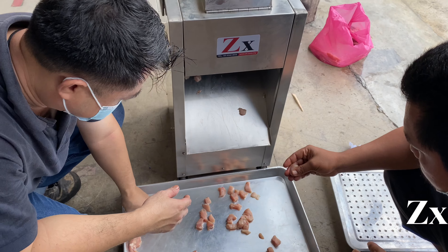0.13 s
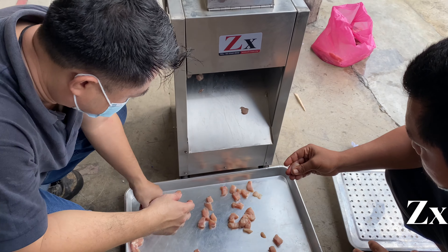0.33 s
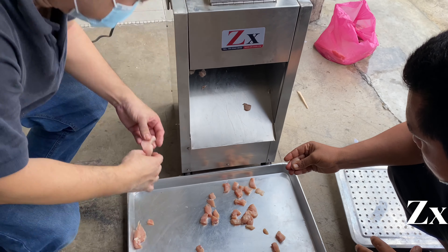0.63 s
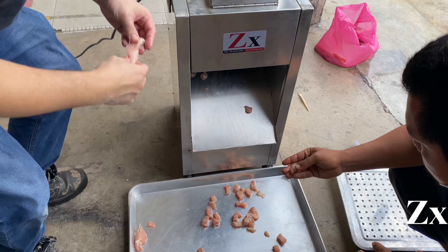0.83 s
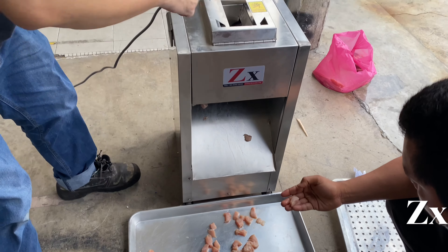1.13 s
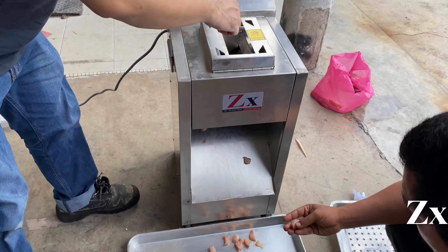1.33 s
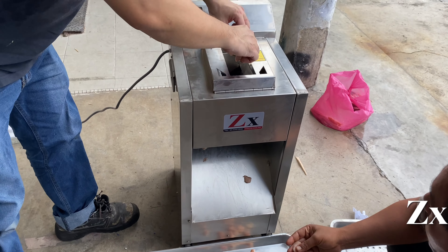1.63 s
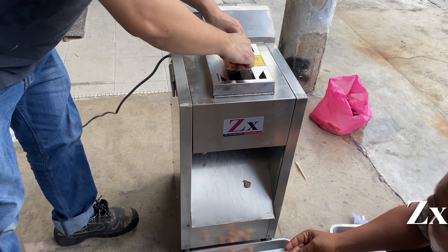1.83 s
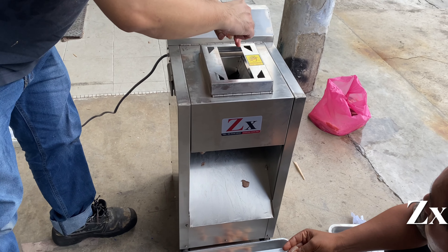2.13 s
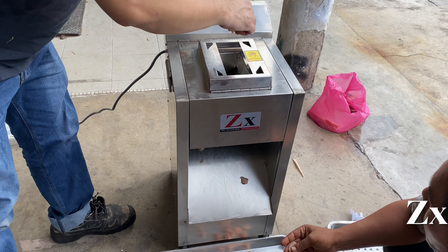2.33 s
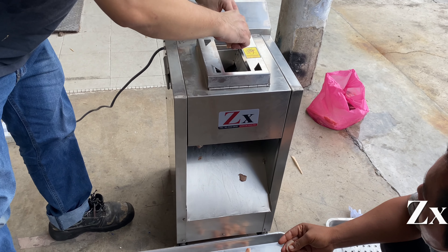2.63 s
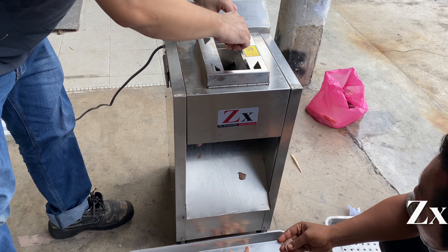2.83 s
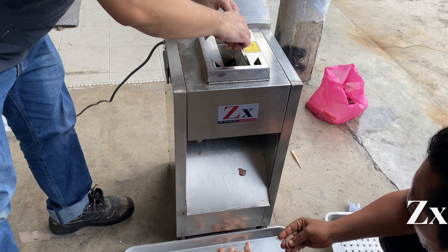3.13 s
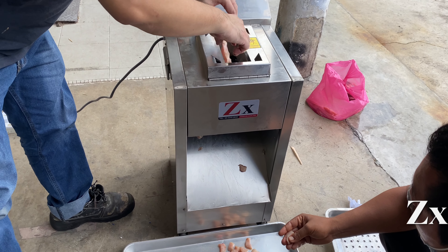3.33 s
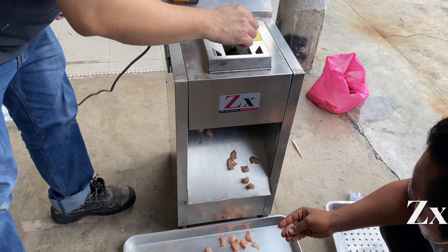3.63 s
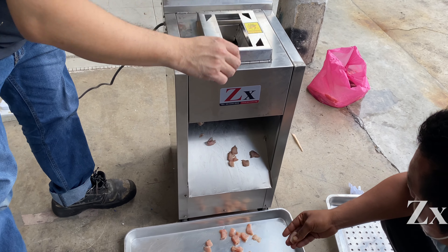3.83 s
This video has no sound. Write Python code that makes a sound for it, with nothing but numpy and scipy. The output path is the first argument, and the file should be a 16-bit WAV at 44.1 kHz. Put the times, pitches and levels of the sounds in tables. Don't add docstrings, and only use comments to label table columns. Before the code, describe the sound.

An electric meat cutter runs throughout on a concrete yard, its motor rumbling and humming, panels rattling about nine times a second, blades hissing, with a few light knocks, heard close on a phone in stereo.

```python
import sys
import numpy as np
from scipy import signal
from scipy.fft import rfft, irfft, next_fast_len
from scipy.io import wavfile

SR = 44100
rng = np.random.default_rng(int(sys.argv[2]) if len(sys.argv) > 2 else 0)


def how_loud(loudness_db):
    steps = np.asarray(loudness_db, float) / 20
    return 10 ** steps


def wav_out(sig):
    wavfile.write(sys.argv[1], SR, np.round(np.clip(np.atleast_2d(sig).T, -1, 1) * 32767).astype(np.int16))


N = 175959


def evened(x):
    return x / np.sqrt(np.mean(x ** 2) + 1e-20)


def read(points, hz):
    f, value = np.transpose(points)
    return np.interp(np.log(hz + 1), np.log(f + 1), value)


def over_time(points):
    return np.interp(np.arange(N) / SR, *np.transpose(points))


def drift(rate_hz):
    spectrum = rfft(rng.standard_normal(N))
    return evened(irfft(spectrum / (1 + (np.fft.rfftfreq(N, 1 / SR) / rate_hz) ** 4), N))


def shaken(colour, strength):
    # [f/Hz, width/Hz, lift/dB]
    panels = [(230, 25, 2), (278, 25, 3), (450, 50, 3), (1250, 80, 3), (5200, 400, 2), (11250, 400, 5),
              (12700, 900, -7), (611, 36, 5), (796, 45, 4), (2130, 50, 5.5), (2445, 45, 4), (3243, 70, 4),
              (6260, 250, 5), (7525, 110, 7)]
    hz = np.fft.rfftfreq(N, 1 / SR)
    lift_db = sum(db / (1 + (2 * (hz - f) / width) ** 2) for f, width, db in panels)
    drive = rfft(strength * rng.standard_normal((2, N)))
    return evened(irfft(drive * how_loud(read(colour, hz) + lift_db), N))


def rumble():
    # [f/Hz, level per Hz/dB]
    colour = [(25, -30), (50, -4), (120, -2), (290, -3), (340, -10), (550, -19.5), (900, -30), (3000, -70)]
    # [t/s, level/dB]
    load = [(0, -2), (.25, -0.5), (.5, -2), (.7, -1.5), (.88, 0.5), (1.1, 0), (1.4, 1), (1.7, -0.5),
            (1.95, -0.5), (2.2, -1), (2.45, -0.5), (2.7, 0.5), (2.95, 0.5), (3.2, -1.5), (3.38, -1.5),
            (3.5, 2.5), (3.7, -0.5), (3.99, 1)]
    strength = how_loud(over_time(load) + 0.18 * drift(rate_hz=6.4))
    return how_loud(-22) * shaken(colour, strength)


def tone(curve, waver_hz, flutter_db):
    t = np.arange(N) / SR
    s, hz, db = np.transpose(curve)
    pitch = np.interp(t, s, hz) + waver_hz * drift(rate_hz=12.48)
    level = how_loud(np.interp(t, s, db) + flutter_db * drift(rate_hz=12.4))
    return np.sqrt(2) * level * np.sin(2 * np.pi * np.cumsum(pitch) / SR)


def motor_tones():
    # [t/s, f/Hz, level/dB]
    boom = [(0.0, 64.4, -49), (0.11, 66.9, -23), (0.27, 65.9, -26), (0.85, 67.4, -29), (0.98, 54.6, -32),
            (1.13, 59.48, -26), (1.98, 64.4, -28), (2.1, 57.5, -33.5), (2.54, 52.8, -23), (2.91, 52.8, -32),
            (3.03, 61.26, -40), (3.33, 60.86, -26), (3.46, 51.8, -33), (3.99, 52.1, -28)]
    # [t/s, f/Hz, level/dB]
    hum = [(0.0, 102.8, -26.5), (1.01, 96.6, -32), (2.22, 101.3, -39), (2.28, 107.4, -33),
           (2.41, 110.6, -41), (2.91, 102.9, -31), (3.06, 107.7, -51), (3.2, 103.5, -29.5),
           (3.66, 99.8, -32.5), (3.89, 107.8, -21), (3.92, 111, -27), (3.99, 103.4, -21)]
    # [t/s, f/Hz, level/dB]
    drone = [(0.0, 202.4, -26.5), (0.13, 197.2, -25), (0.25, 192.9, -26), (0.71, 207, -32.5),
             (0.81, 201.2, -21), (1.09, 203, -39), (1.22, 208.4, -21), (1.32, 197.9, -27.5),
             (1.58, 200.1, -35), (1.78, 198.6, -22.5), (1.94, 199.0, -53), (2.06, 203.4, -16),
             (2.08, 205.2, -29), (2.4, 203.5, -28), (2.64, 193.6, -26.5), (2.79, 202.7, -28),
             (3.87, 201.2, -28), (3.99, 214, -23)]
    # [t/s, f/Hz, level/dB]
    panel_hum = [(0.0, 271.2, -15.5), (0.04, 286.4, -47), (0.54, 277.4, -28), (0.59, 259.1, -34),
                 (0.92, 282.3, -28.5), (1.38, 274.1, -28), (1.43, 258.9, -32), (1.5, 293.6, -19),
                 (1.62, 257.2, -45), (1.7, 280.9, -26), (2.57, 276.7, -24.5), (2.71, 297.8, -27.5),
                 (2.79, 262.5, -24), (3.09, 285.7, -29.5), (3.68, 263.6, -31), (3.73, 296.7, -26),
                 (3.81, 269.9, -27), (3.99, 290.6, -21)]
    # [t/s, f/Hz, level/dB]
    chute_hum = [(0.0, 153, -24), (0.2, 161, -23), (0.29, 142.4, -19), (0.48, 168, -23),
                 (0.54, 131.9, -19.5), (0.82, 131, -25.5), (1.18, 159, -23), (1.6, 131, -26.5),
                 (1.89, 147.4, -24), (2.04, 141.2, -23), (2.18, 166, -22), (2.24, 140.5, -26.5),
                 (3.3, 164.2, -36), (3.38, 152.1, -27), (3.93, 160, -21.5), (3.99, 148, -32)]
    tones = tone(boom, waver_hz=3.46, flutter_db=3.0)
    tones += tone(hum, waver_hz=5.12, flutter_db=2.0)
    tones += tone(drone, waver_hz=4.45, flutter_db=3.0)
    tones += how_loud(-8) * tone(panel_hum, waver_hz=3.07, flutter_db=1.5)
    tones += how_loud(-6.5) * tone(chute_hum, waver_hz=3.1, flutter_db=1.5)
    return np.array([tones, tones[::-1]])


def bits():
    # [t/s, level/dB, centre f/Hz, decay/s]
    puffs = [(0.39, -27, 12700, .012), (0.392, -32, 5000, .006), (.549, -30, 1300, 0.013),
             (1.0, -29.5, 1920, 0.053), (2.07, -28.5, 2000, 0.052), (2.1, -29, 920, 0.039),
             (2.7526, -34, 12500, 0.0076), (2.8, -38, 2200, 0.027), (2.9716, -36, 12150, 0.0095),
             (3.739, -39, 5500, .03), (3.7516, -20, 1407, 0.008), (3.752, -29.5, 2400, 0.0098),
             (3.6, -35, 4200, .008), (3.8, -34, 1060, .02), (3.75, -40, 600, 0.016),
             (0.891, -29, 2000, 0.024), (.45, -33, 2000, 0.036), (0.885, -13, 185, 0.028),
             (.78, -20.5, 134, 0.068), (3.46, -18.5, 164, 0.061)]
    size = 8192
    low, high = np.zeros((2, N)), np.zeros((2, N))
    t, hz = np.arange(size) / SR, np.fft.rfftfreq(size, 1 / SR)
    for s, db, centre_hz, decay_s in puffs:
        bell = np.exp(-(np.log((hz + 1) / centre_hz) / 0.43) ** 2)
        band = irfft(rfft(rng.standard_normal((2, size))) * bell)
        envelope = np.minimum(t / 0.00034, 1) * np.exp(-t / decay_s)
        puff = how_loud(db) * evened(band) * envelope
        at = round(s * SR)
        side = low if centre_hz < 4000 else high
        side[:, at:at + size] += puff[:, :N - at]
    return low, high


def clatter():
    # [f/Hz, ring/s]
    loose = [(953, 0.0079), (1130, 0.0067), (1267, 0.01), (1420, 0.0099), (1856, 0.017), (2130, 0.016),
             (2053, 0.0074), (2270, 0.0058), (2442, 0.0082)]
    # [t/s, level/dB, f/Hz]
    knocks = [(0.0777, -21, 1250), (0.1695, -26, 1160), (0.2229, -21, 1250), (0.3365, -25, 1310),
              (0.5492, -18, 1240), (0.8314, -21, 1116), (1.2007, -16, 1204), (1.5424, -23, 1813),
              (1.5991, -19, 1210), (1.943, -21, 1310), (1.9754, -25, 1420), (2.1535, -23, 1860),
              (2.314, -20, 1230), (2.4418, -18, 1310), (2.5195, -18, 1130), (2.7409, -19, 1237),
              (2.805, -16, 2130), (2.9286, -24, 1210), (3.1053, -21, 1373)]
    taps_per_s, spread_db = 260, 4
    t, out = np.arange(2048) / SR, np.zeros((2, N))
    for hz, ring_s in loose:
        struck = rng.random((2, N)) < taps_per_s / len(loose) / SR
        force = how_loud(spread_db * np.minimum(rng.exponential(1, (2, N)), 3.2))
        ring = np.exp(-t / ring_s) * np.sin(2 * np.pi * hz * t)
        out += signal.oaconvolve(struck * force, ring[None])[:, :N]
    out = how_loud(-40.5) * evened(out)
    for s, db, hz in knocks:
        knock = np.exp(-t / 0.0048) * np.sin(2 * np.pi * hz * t)
        out[0, round(s * SR):][:2048] += how_loud(db - 8) * knock
    return out


def gear_mesh():
    # [t/s, level/dB]
    mesh = [(0, 3.5), (.25, 0), (.45, 0), (.65, 1), (.9, 1), (1.02, -1), (1.2, 0.5), (1.4, 0.5), (1.58, 1),
            (1.75, 0), (1.969, 2), (2.15, 1), (2.3, 1), (2.6, -0.5), (2.85, 1.5), (3.2, 0), (3.6, 1.5),
            (3.99, 1.5)]
    return over_time(mesh)


def turning():
    bite_db = [1, -0.5, -2.5, 3, -0.5, 2, 0.5, 0.5, -1.5, 3.5, 4, 0.1, 0, 2.5, -0.6, 3, -4, 2, 0.1, 0, -2,
               -5, 2, -1, 2, 2, -1.5, 1, 1, 0.5, 2, 0, -2, -2, -1, 0, 1.5, 0.1]
    turns_per_s, first_turn_s = 9.09, -0.006
    rise_s, fall_s, spread_db = 0.013, 0.031, 0.6
    t, out = np.arange(N) / SR, np.zeros(N)
    for lag, db in ((0, 0), (0.69, -9.5)):
        turns = (t - first_turn_s) * turns_per_s - lag + 1
        since = turns % 1 / turns_per_s
        bites = how_loud(db + np.array(bite_db) + spread_db * rng.standard_normal(len(bite_db)))
        size = bites[turns.astype(int)]
        out += size * (1 - np.exp(-since / rise_s)) * np.exp(-since / fall_s)
    return out


def gear_rattle(mesh_db, chatter, turn):
    # [f/Hz, level per Hz/dB]
    colour = [(250, -15), (500, 0), (1300, -1), (1700, -5), (2300, -6), (3300, -11), (4500, -19),
              (8500, -50)]
    strength = how_loud(mesh_db + 0.19 * chatter + 1.05 * drift(rate_hz=13.4) + 2.8 * turn)
    return how_loud(-29.5) * shaken(colour, strength)


def blade_hiss(chatter):
    # [f/Hz, level per Hz/dB]
    colour = [(3000, -9), (5000, -1.5), (6800, -4), (8300, -0.5), (9200, 0.5), (10500, -4.5), (13700, 2),
              (15400, 2.5)]
    easing_db = 0.4 * np.arange(N) / SR
    strength = how_loud(0.56 * chatter + 0.78 * drift(rate_hz=78) - easing_db)
    return how_loud(-31) * shaken(colour, strength)


def blade_scrape(mesh_db, turn):
    # [f/Hz, level per Hz/dB]
    colour = [(1500, -17), (3500, -4), (5200, -0.5), (6250, 1), (6900, -4), (10000, -4.5), (12700, -6),
              (15000, 0)]
    strength = turn * how_loud(0.92 * mesh_db + 2.0 * drift(rate_hz=26))
    return how_loud(-37) * shaken(colour, strength)


def ports(direct, diffuse, same, lead, side_db, linger=0):
    hz = np.fft.rfftfreq(N, 1 / SR)
    likeness = np.clip(read(same, hz), 0, 1)
    half = how_loud(read(side_db, hz) / 2)
    left, other = rfft(direct), rfft(diffuse)
    turn = np.interp(hz, *np.transpose(lead))
    phase = turn - linger * np.sin(2 * turn) / 2
    right = (likeness * left + np.sqrt(1 - likeness ** 2) * other) * np.exp(1j * phase)
    return irfft(np.array([left * half, right / half]), N)


def swayed(pair):
    wobble = np.exp(1j * 0.2 * drift(rate_hz=23))
    right = signal.hilbert(pair[1], next_fast_len(N))[:N]
    return np.array([pair[0], (right * wobble).real])


def cabinet_at_ports(body):
    # [f/Hz, likeness, clipped to 0-1]
    same = [(60, 4.3), (300, 1.3), (620, 0.51), (900, 0.72), (1600, 0.65), (2200, 0.6), (3200, 0.7),
            (4500, 0)]
    # [f/Hz, phase/rad]
    lead = [(0, 0), (400, 0.52), (1400, -0.9), (1700, -0.15), (2000, -0.53), (3600, -2.5), (6000, -3)]
    # [f/Hz, level/dB]
    side_db = [(60, -1.1), (250, -1.5), (420, 2), (620, -1), (1100, 2), (2400, -2.5), (3500, 1)]
    return ports(*body, same, lead, side_db)


def blades_at_ports(blades):
    # [f/Hz, likeness 0-1]
    same = [(4000, .4), (5200, .4), (6500, .65), (7000, .4), (7600, .7), (8300, .968), (9600, .99),
            (16000, .994)]
    # [f/Hz, phase/rad]
    lead = [(3000, .6), (6600, -.1), (8350, 2.95), (8600, 3.3), (9750, 6.2), (10450, 6.4), (11800, 9.3),
            (12650, 9.72), (13300, 11.75), (13750, 12.25), (14350, 12.65), (15800, 15.6), (17000, 15.8)]
    # [f/Hz, level/dB]
    side_db = [(3000, 1), (5000, 4), (6600, 1), (7400, 2.5), (8200, 0), (16000, 0)]
    return swayed(ports(*blades, same, lead, side_db, linger=0.024))


def scene():
    turn, chatter, mesh_db = turning(), drift(rate_hz=31), gear_mesh()
    low_bits, high_bits = bits()
    body = rumble() + motor_tones() + low_bits + clatter() + gear_rattle(mesh_db, chatter, turn)
    blades = high_bits + blade_hiss(chatter) + blade_scrape(mesh_db, turn)
    return cabinet_at_ports(body) + blades_at_ports(blades)


def low_pass(x):
    return signal.sosfilt(signal.butter(12, 16140, fs=SR, output="sos"), x)


def record(dry):
    edge = signal.firwin(511, 15780, window=("kaiser", 9), fs=SR)
    mix = signal.oaconvolve(dry, edge[None], "same")
    return low_pass(mix)


dry = scene()
out = record(dry)
wav_out(out)
```